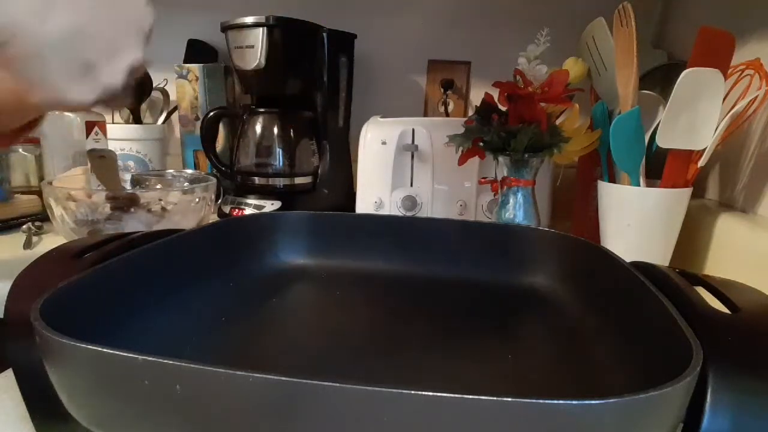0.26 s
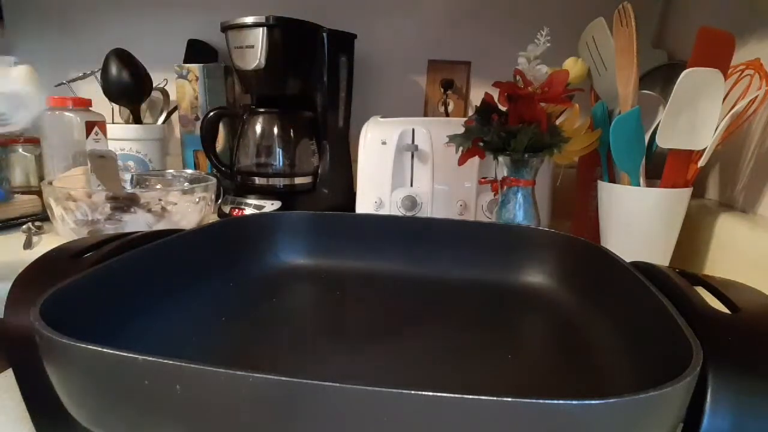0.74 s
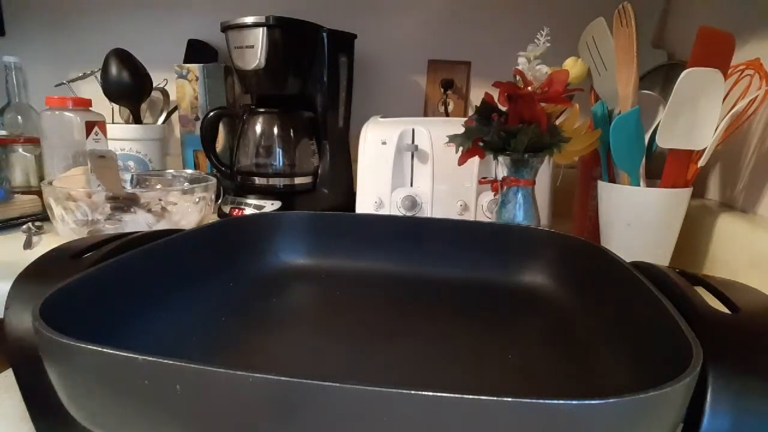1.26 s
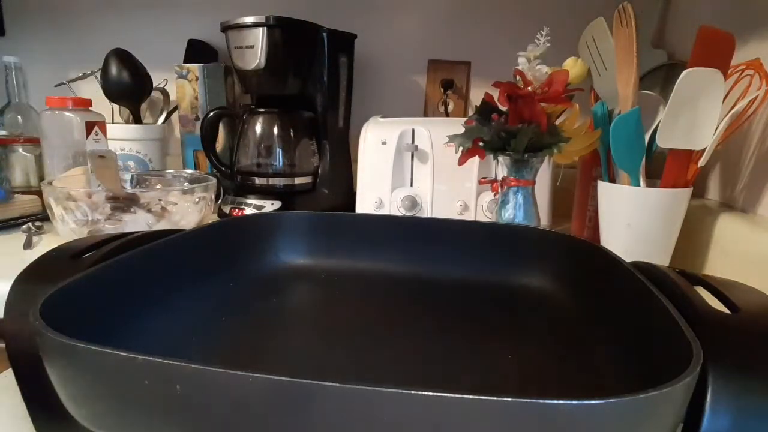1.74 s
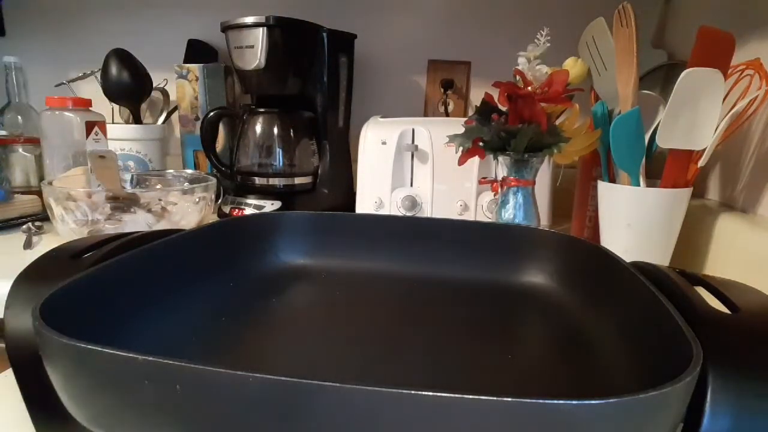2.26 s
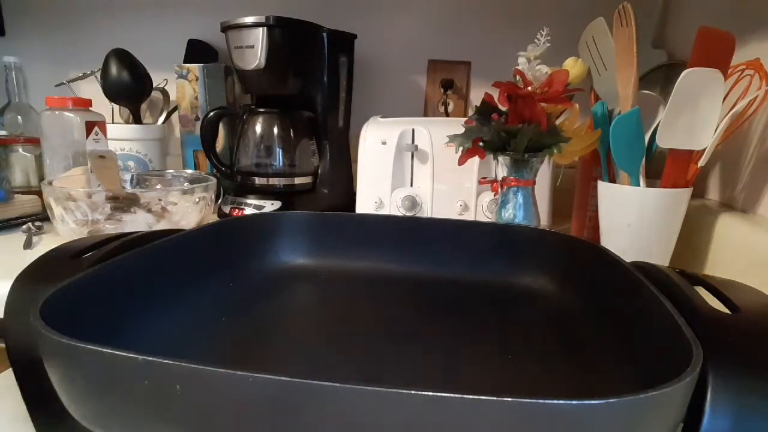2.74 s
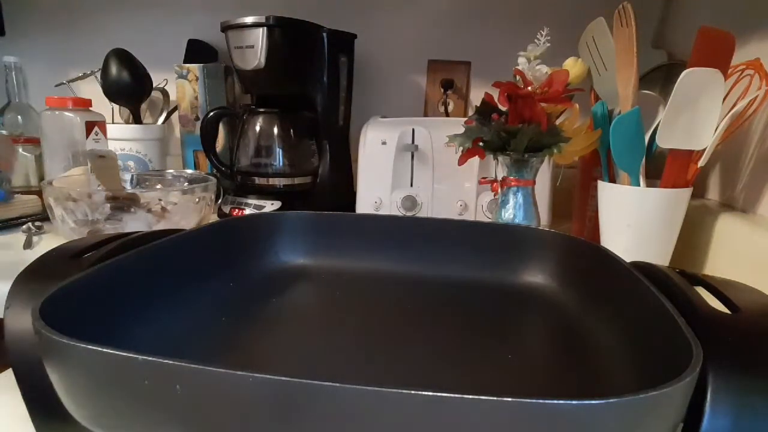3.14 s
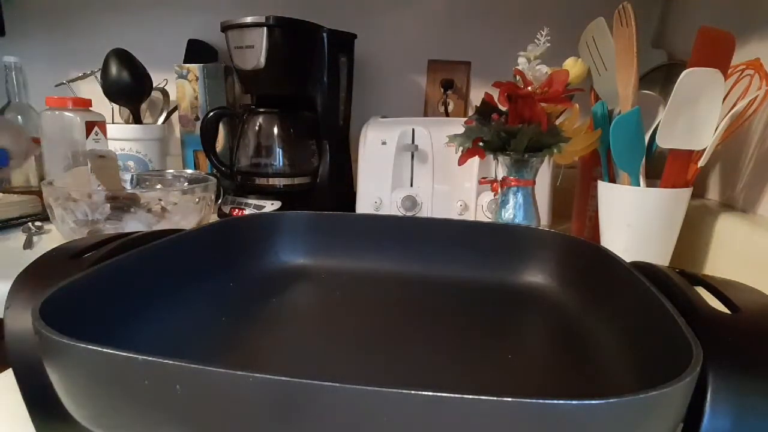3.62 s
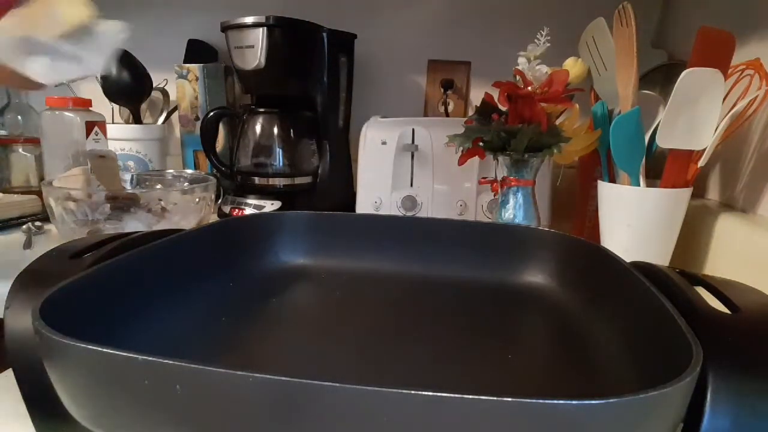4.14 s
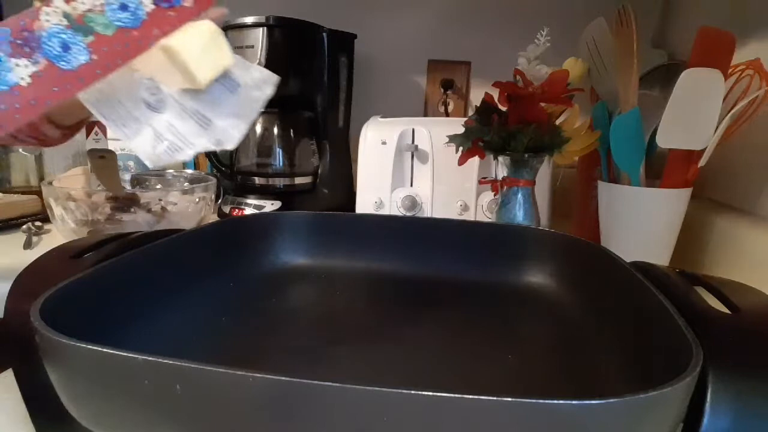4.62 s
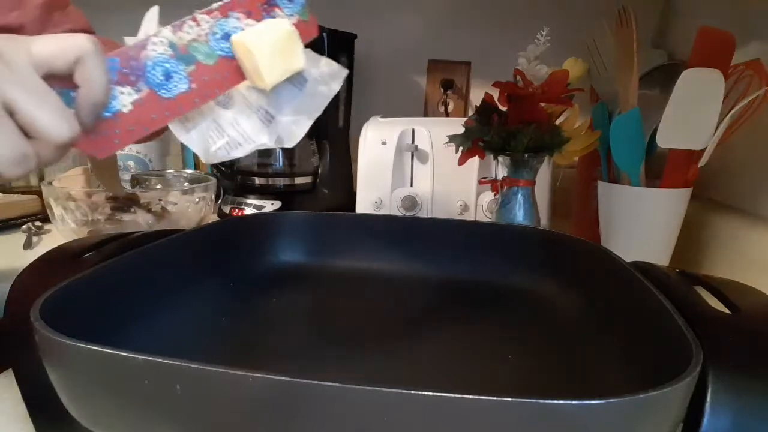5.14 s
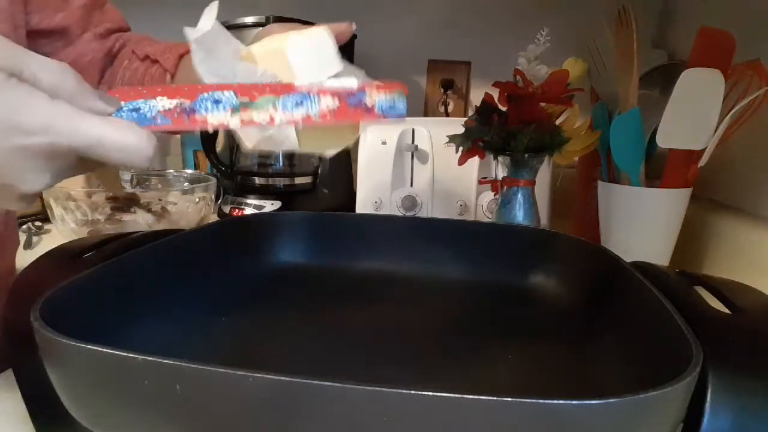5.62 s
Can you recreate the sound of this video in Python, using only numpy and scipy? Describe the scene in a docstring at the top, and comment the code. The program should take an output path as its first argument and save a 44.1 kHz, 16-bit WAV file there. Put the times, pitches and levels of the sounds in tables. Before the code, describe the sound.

Waxed butter paper crinkles and snaps in busy hands, a knife clacks once on a dish, then sparser crackles over faint room rumble.

```python
"""Waxed butter paper is unfolded and torn by hand: crease snaps, each a flurry of noise ticks ringing
a small panel and a hollow packet, over a rustle of countless random folds in half-octave bands.
A knife cuts through onto a dish, heard as a crack, rough decaying modes and a counter knock.
Feet shift on the floor as soft low thuds, above a steady household rumble and hiss.
A small hard kitchen adds a short diffuse tail; a camera with two spaced ports hears it all."""
import sys
import numpy as np
from scipy import signal
from scipy.io import wavfile
from scipy.ndimage import uniform_filter1d

SR = 44100
rng = np.random.default_rng(int(sys.argv[2]) if len(sys.argv) > 2 else 0)


def transcribe(u):
    """Save the signal u as a 16-bit wav file named by the first command-line argument.

    u: samples, shape (n,) or (channels, n), limited to [-1, 1]; the rate is SR.
    q: integer samples, one column per channel.
    """
    v = np.clip(np.atleast_2d(u).T, -1, 1)
    q = np.round(v * 32767).astype(np.int16)
    wavfile.write(sys.argv[1], SR, q)


N = 258867  # length in samples

# Spectrum of the waxed sheet. Each row: frequency in Hz, relative level in dB per Hz.
PAPER_SPECTRUM = [(180, -35), (300, -19.5), (352, -9.5), (818, -6.5), (2060, -1.5), (2540, -0.5),
                  (3120, -1), (6590, -5), (9510, -16.5), (11900, -31.5), (13500, -61.5)]
# How the hands move about. Each row: time in seconds, left minus right in dB,
# base level of the snaps' top treble in dB.
HAND_MOVES = [(0.3, 2.2, -37), (1.1, 0, -10), (1.8, -1.5, -31), (2.3, 0.8, -2.5), (3.0, -0.2, -16),
              (5.0, 2, -8), (5.6, 3.5, -12)]
HALF_OCTAVES_HZ = 280 * 2 ** np.arange(0, 5.7, .5)


def undb(db):
    """Decibels to amplitude."""
    return 10 ** (np.asarray(db) / 20)


def unit(x):
    """Scale to an RMS of 1."""
    return x / np.sqrt(np.mean(x ** 2))


def peak_one(x):
    """Scale to a peak of 1."""
    return x / abs(x).max()


def at_hz(table, hz):
    """Read a (Hz, value) table on a log-frequency axis."""
    table_hz, values = np.array(table).T
    return np.interp(np.log(hz), np.log(table_hz), values)


def band(x, hz, width):
    """Two-pole resonance, gain 1 at the centre."""
    return signal.lfilter(*signal.iirpeak(min(hz, .45 * SR), hz / width, fs=SR), x)


def band_twice(x, hz, width):
    """The same resonance twice over, for steeper skirts."""
    return band(band(x, hz, width), hz, width)


def coloured(x, table):
    """Sum of half-octave bands weighted by a spectrum."""
    return sum(undb(at_hz(table, hz)) * band_twice(x, hz, hz / 2) for hz in HALF_OCTAVES_HZ)


def walk(rate):
    """Random level that glides to a new value every 1 / rate seconds."""
    k = int(SR / rate)
    held = np.repeat(rng.standard_normal(N // k + 1), k)
    return 0.99 * uniform_filter1d(held, k)[:N]


def add(out, s, sound, pan_db):
    """Mix a sound in at time s; pan_db is left minus right."""
    i = int(s * SR)
    sides = undb(np.array([[pan_db], [-pan_db]]) / 2)
    out[:, i:i + sound.shape[-1]] += sides * sound[..., :N - i]


def burst(noise, rise_ms, t60):
    """Noise that swells exponentially and falls 60 dB in t60 seconds."""
    t = np.arange(noise.shape[-1]) / SR
    return noise * (1 - np.exp(-t * 1000 / rise_ms)) * 1000. ** (-t / t60)


def two_ways(a, c, apart):
    """One excitation as it reaches two ports: a shared part and a part of opposite sign."""
    return np.array([a + apart * c, a - apart * c])


def house():
    """Steady rumble and hiss; the bass is much alike at both ports, the treble unrelated."""
    # Each row: frequency in Hz, relative level in dB per Hz.
    house_spectrum = [(18, -44), (30, -11.5), (171, 7.5), (292, 1.5), (539, -2.5), (771, -14), (1890, -15),
                      (2560, -27.5), (7500, -24), (9200, -44), (11600, -45), (13500, -52)]
    level_db = -57.5  # RMS, before the 1.2 dB lift left and cut right
    out = 0
    for hz in 30 * 2 ** np.arange(0, 8.9, .5):
        mid, side = (band_twice(rng.standard_normal(N), hz, hz / 2) for _ in range(2))
        wide = np.clip(0.33 + hz / 2800.0, 0, 1)
        level = undb(at_hz(house_spectrum, hz) + 4.7 * walk(8.0))  # each band wavers on its own
        out = out + level * two_ways(mid, side, wide)
    return unit(out) * undb(level_db + np.array([[1.2], [-1.2]]))


def kitchen(x):
    """Diffuse echoes: noise dying away octave by octave, building up over the first milliseconds."""
    # Each row: frequency in Hz, time to fall 60 dB in seconds.
    decay_times = [(100, 0.55), (1000, 0.2), (4000, 0.34), (12000, 0.14)]
    room_db, build_s = -9, .012
    t, tail = np.arange(SR // 2) / SR, 0
    for hz in 90 * 2 ** np.arange(0, 8):
        mid, side = rng.standard_normal((2, len(t)))
        both = two_ways(mid, side, np.clip(hz / 630.0, 0, 1))  # the bass is narrower
        tail = tail + band(both, hz, 1.8 * hz) * 1000. ** (-t / at_hz(decay_times, hz))
    tail = tail * np.clip(t / build_s, 0, 1) ** 2
    tail = tail / np.linalg.norm(tail, axis=1, keepdims=True)
    # the right channel alone feeds both tails
    return undb(room_db) * signal.fftconvolve(x[1:], tail, axes=1)[:, :N]


def steps():
    """Soft pushes that ring a floorboard; the boards reach the two ports by different paths."""
    # Weight shifting on the floor. Each row: time in seconds (the swell starts 10 ms ahead),
    # peak level in dB, board pitch in Hz.
    footfalls = [(0.523, -45, 223), (1.418, -42.5, 178), (2.071, -51, 102), (3.218, -47.5, 107.7),
                 (3.26, -41.5, 110.8), (3.519, -33.5, 171), (3.558, -35, 139), (4.445, -38, 175.5),
                 (4.994, -38, 168.5)]
    out, noise = np.zeros((2, N)), rng.standard_normal((len(footfalls), 2, SR // 2))
    for (s, db, hz), (a, c) in zip(footfalls, noise):
        push = burst(two_ways(a, c, .36), rise_ms=22.0, t60=0.3)
        board = band(band(push, hz, 0.19 * hz), hz, 1.0 * hz)
        broad = band(band(push, 0.66 * hz, 6.2 * hz), 0.96 * hz, 2.2 * hz)
        add(out, s - .01, undb(db) * peak_one(board + 0.17 * broad), 1.5)
    return out


def cut():
    """The blade lands on the dish; dish and cutlery rattle, so each mode is a rough band, not a line."""
    # Modes of dish and cutlery. Each row: frequency in Hz, width in Hz before broadening,
    # relative level in dB.
    dish_modes = [(331, 60, -11), (1185, 84, -8.5), (1377, 25, -12.5), (1794, 18, -1.5), (1906, 21, -3),
                  (2230, 30, -5), (2290, 20, -3), (2390, 59, -8), (2910, 24, -5), (3030, 84, 1.5),
                  (3171, 15, -5.5), (3215, 42, -6.5), (3760, 26, -5), (3904, 76, 0), (4200, 35, -7.5),
                  (4753, 42, 0.5), (5400, 41, -7.5), (5630, 90, -7), (6130, 90, -6.5), (6760, 58, -7),
                  (7150, 200, -10), (7780, 150, -11.5), (8240, 220, -14.5), (10670, 520, -12),
                  (11000, 340, -17.5)]
    cut_s, cut_db, pan_db = 3.6328, -5, 2.2
    t60_s, t60_per_octave = 0.15, 0.93  # at 3 kHz; higher modes die sooner
    out, ring, settle = np.zeros((2, N)), 0, 8192  # samples for the filters to settle
    rattle = rng.standard_normal((len(dish_modes), 2, SR // 2 + settle))
    for (hz, width, db), noise in zip(dish_modes, rattle):
        mode = band(band(noise, hz, 1.9 * width), hz, 3 * width)[:, settle:]
        mode = burst(mode, 3.9, t60_s * t60_per_octave ** np.log2(hz / 3000))
        ring = ring + undb(db) * unit(mode)
    chatter = undb(4.0 * walk(120)[:SR // 2])  # the blade chatters on the glaze
    add(out, cut_s, undb(cut_db - 30.0) * ring * chatter, pan_db)

    crack = coloured(burst(rng.standard_normal((2, 8192)), 0.56, 0.044), PAPER_SPECTRUM)
    add(out, cut_s, undb(cut_db - 2.0) * peak_one(crack), pan_db)

    # the counter under the dish
    knock = burst(rng.standard_normal(8192), 1.0, 0.1)
    counter = band(knock, 865, 390)
    counter = counter + undb(-1.5) * band(band(knock, 270, 80), 255, 150)
    counter = counter + undb(-8.5) * band(band(knock, 55, 50), 55, 80)
    add(out, cut_s, undb(cut_db - 8.5) * peak_one(counter), pan_db)
    return out


def handling():
    """Bouts swell, hold and die away; overlapping bouts add up, their tilts averaged by strength."""
    # Bouts of handling the paper. Each row: start in seconds, hold in seconds, rustle level in dB,
    # treble tilt in dB per octave.
    bouts = [(-0.04, 0.013, -32.5, 0.5), (0.1, 0.12, -39, -2), (0.417, 0.15, -38, 1),
             (0.756, 0.05, -47, 1.5), (0.86, 0.072, -34, 0), (1.055, 0.1, -29, 1.5), (1.307, 0.29, -47, 1),
             (1.57, 0.21, -49, 0.5), (1.804, 0.17, -42, 1), (2.144, 0.012, -47.5, -5),
             (2.22, 0.043, -39.5, 1), (2.38, 0.046, -43, -2.5), (2.639, 0.044, -50, 4.5),
             (2.752, 0.052, -47, -3), (2.866, 0.069, -45, -5), (3.135, 0.05, -52, 3.4),
             (3.487, 0.044, -46.5, -4.5), (3.965, 0.17, -64.5, 4), (4.447, 0.034, -61, -3),
             (4.684, 0.06, -57.5, 1.5), (4.878, 0.09, -51.5, -3.5), (5.371, 0.094, -51, -7.5),
             (5.546, 0.032, -41.5, -3.5), (5.773, 0.092, -59.5, -3)]
    attack_s, fall_db_s = 0.036, 165
    start, hold, db, tilt = np.array(bouts).T[..., None]
    grid_s = np.arange(0, N, 44) / SR  # about one point per millisecond
    t = grid_s - start
    fallen_db = fall_db_s * np.maximum(t - attack_s - hold, 0)
    gain = np.clip(t / attack_s, 0, 1) ** 2 * undb(db - fallen_db)
    total = gain.sum(axis=0) + 1e-9
    mean_tilt = (gain * tilt).sum(axis=0) / total
    return (np.interp(np.arange(N) / SR, grid_s, curve) for curve in (total, mean_tilt))


def folds(hz):
    """Sparse folds that only panels of one size answer; each dies away over some ten cycles."""
    sizes = undb(4.5 * np.minimum(rng.exponential(size=N), 3))
    hits = min(hz / 1500, 1) * sizes * (rng.random(N) < 60 / SR)  # about 60 a second
    return signal.lfilter([1], [1, -np.exp(-hz / SR / 9.9)], hits)


def rustle():
    """Countless small folds: ticks of very unequal size, partly common to all bands, in uneven flurries."""
    gain, tilt = handling()
    sizes = undb(3.1 * np.minimum(rng.exponential(size=N), 5))
    common = sizes * (rng.random(N) < .01)
    common = signal.lfilter([1], [1, -.97], common)  # each fold lasts about a millisecond
    flurry_db, out = 3.5 * walk(60), 0
    for hz in HALF_OCTAVES_HZ:
        a, c = rng.standard_normal((2, N))
        strength = 0.73 + 0.51 * common + 1.4 * folds(hz)
        flutter = undb(-6.5 + flurry_db + 3.0 * walk(55))  # shared flurry plus the band's own
        ticks = two_ways(a, c, 0.91) * strength * flutter
        colour = undb(at_hz(PAPER_SPECTRUM, hz) + tilt * np.log2(hz / 3000))
        out = out + colour * band_twice(ticks, hz, hz / 2)
    hand_s, hand_pan_db, _ = np.transpose(HAND_MOVES)
    pan_db = np.interp(np.arange(N) / SR, hand_s, hand_pan_db)
    return out * gain * undb(np.array([pan_db, -pan_db]) / 2)


def snaps():
    """A crease buckles in a flurry of ticks; they ring a small panel of paper and thump the packet."""
    # Each row: start in seconds, peak of the sheet sound in dB, panel pitch in Hz,
    # hollow knock in dB relative to that peak, nominal fall in ms.
    creases = [(0.0282, -22.5, 2900, -39, 5), (0.1126, -23, 2090, -25, 6), (0.134, -25, 2960, -33, 22),
               (0.177, -23.5, 2300, -24, 9), (0.1938, -23, 3370, -24, 10.4), (0.2372, -16.5, 3580, -18, 8),
               (0.25, -18, 3800, -17.5, 9), (0.2786, -19, 4970, -15, 8), (0.452, -11.5, 3540, -35, 7.4),
               (0.525, -15.5, 3520, -21, 19), (0.775, -30.5, 5060, -18, 2.8), (0.8802, -27, 3820, -20, 21),
               (0.9232, -17, 1750, -11.5, 6.1), (0.938, -12.5, 3500, -38, 6.1),
               (1.021, -11.5, 3240, -10, 10.7), (1.063, -6, 3440, -18.5, 2.1),
               (1.15, -15.5, 3860, -7.5, 15.4), (1.1956, -23.5, 3960, -7.5, 15),
               (1.225, -20.5, 3660, -26, 5.1), (1.249, -16, 3700, -13, 4.6), (1.2578, -39, 2000, -4, 1.6),
               (1.303, -22, 4200, -23, 4.5), (1.5238, -31, 2620, -23, 24), (1.6855, -31.5, 6800, -34, 1.8),
               (1.714, -25, 2040, -29, 4.7), (1.725, -21, 2120, -33, 3.6), (1.811, -16, 1960, -27, 11),
               (1.8156, -6.5, 2750, -18.5, 6.6), (1.827, -18.5, 2100, -24, 14),
               (1.8928, -18, 2010, -23, 1.9), (1.9005, -14.5, 2070, -53, 28),
               (1.9202, -7.5, 4070, -29.5, 2.7), (1.925, -9, 2300, -10, 4), (2.022, -23, 2380, -19, 2.7),
               (2.126, -35, 4330, -30, 5.6), (2.167, -32, 4850, -37, 2), (2.175, -36, 1920, -6, 11.4),
               (2.2244, -21, 1900, -19.5, 4), (2.294, -22, 4800, -22, 2), (2.307, -25, 2060, -16, 6),
               (2.328, -6.5, 4780, -31.5, 1.5), (2.796, -38, 1710, 2.5, 8.7),
               (2.891, -24.5, 1960, -15, 6.8), (2.896, -16.5, 3240, -25, 7.1), (2.903, -20.5, 3650, -19, 6),
               (2.9529, -17.5, 4860, -47, 5), (2.979, -29.5, 4140, -30, 32), (3.0988, -27, 3640, -29, 25),
               (3.9735, -36, 2020, -12.5, 19), (4.322, -48, 4400, -25, 29), (4.4231, -37.5, 1790, -4, 13.8),
               (4.939, -31.5, 4220, -18, 25.4), (4.96, -29.5, 3320, -36, 27),
               (4.987, -29.5, 2000, -21, 3.4), (5.0149, -17, 3840, -40, 4.1), (5.1739, -28.5, 2850, -23, 3),
               (5.19, -13, 2900, -29, 8.8), (5.2731, -32.5, 1560, 6.5, 1.49), (5.453, -33, 1980, -14, 8),
               (5.4875, -7, 3940, -14, 1.07), (5.497, -36, 5800, -24, 4.4), (5.534, -22, 2060, -10, 12.6),
               (5.603, -17.5, 2060, -28, 3), (5.6084, -15.5, 2960, -26, 5), (5.6269, -22, 3000, -13, 4),
               (5.645, -16, 3980, -15.5, 4.8), (5.657, -27, 3040, 0, 3.2)]
    # The hollow knock as the packet changes shape in the hands. Each row: time in seconds, pitch in Hz.
    packet_pitch = [(0.2, 602), (0.93, 542), (1.03, 373), (1.15, 349), (1.5, 358), (1.82, 460), (3.1, 425),
                    (5.2, 414), (5.3, 667), (5.5, 705), (5.63, 324)]
    glint_hz, glint_width_hz, loud_snap_db = 11800, 6800, -15
    hand_s, hand_pan_db, hand_top_db = np.transpose(HAND_MOVES)
    out, noise = np.zeros((2, N)), rng.standard_normal((len(creases), 3, 4096))
    random_places = rng.random((len(creases), 5))
    t = np.arange(4096) * 1000 / SR  # ms
    for (s, db, hz, knock_db, fall_ms), (a, b, c), places in zip(creases, noise, random_places):
        rise_ms = 2.019 + 0.1164 * fall_ms  # a longer flurry also starts more slowly
        knock_hz = np.interp(s, *np.transpose(packet_pitch))
        pan_db = np.interp(s, hand_s, hand_pan_db)
        top_db = np.interp(s, hand_s, hand_top_db)

        # uneven ticks around the main crack
        fall = np.exp(-(abs(t - rise_ms) / (1.185 * fall_ms)) ** 1.4)
        shape = np.where(t < rise_ms, (t / rise_ms) ** 2, fall)
        crack = 1.2 * np.exp(-(4 * (t - rise_ms)) ** 2)
        flurry = shape * undb(25 * uniform_filter1d(b, size=40)) + crack
        ticks = flurry * two_ways(a, c, 0.84)  # the sheet radiates unevenly towards the two ports

        panel = band(band(ticks, hz, .2 * hz), hz, hz)
        sheet = unit(coloured(ticks, PAPER_SPECTRUM)) + 1.6 * unit(panel)
        # a few narrow resonances at random pitches colour each snap
        pitches = 1700 * 4.5 ** places
        resonances = sum(band(band(ticks, f, .06 * f), f, f) * 3000 / f for f in pitches)
        sheet = sheet + 1.3 * unit(resonances)
        # quick, hard snaps are brighter
        glint_db = top_db - 1.6 * np.log2(fall_ms) + .25 * (db - loud_snap_db)
        sheet = sheet + undb(glint_db) * unit(band_twice(ticks, glint_hz, glint_width_hz))

        knock = band(ticks[0], knock_hz, 0.095 * knock_hz) + 0.26 * ticks[0]
        knock = band(knock, knock_hz, 3.7 * knock_hz)
        knock = band(knock, 1.7 * knock_hz, 1.86 * knock_hz)  # a small packet gives no deep bass
        add(out, s, undb(db) * (peak_one(sheet) + undb(knock_db) * peak_one(knock)), pan_db)
    return out


def scene():
    """Paper and knife, direct and through the kitchen, over the floor and the household."""
    hands = snaps() + rustle() + cut()
    port_lag_ms = .41
    lag = int(round(port_lag_ms * SR / 1000))
    left = np.r_[np.zeros(lag), hands[0, :N - lag]]  # the left port hears it later
    direct = np.array([left, hands[1]])
    return direct + kitchen(hands) + steps() + house()


def record(dry):
    """The camera's case colours the sound; the loudest peaks are rounded and the top is cut."""
    # Resonance and hollow of the case. Each row: centre in Hz, width in Hz,
    # share added to the sound (negative for the hollow).
    case_modes = [(2006, 240, 0.13), (2550, 360, -0.19)]
    top_hz = 13600
    heard = dry + sum(share * band(dry, hz, width) for hz, width, share in case_modes)
    rounded = 1.3 * np.tanh(heard / 1.3)
    return signal.sosfilt(signal.ellip(8, .2, 70, top_hz, fs=SR, output="sos"), rounded)


dry = scene()
out = record(dry)
transcribe(out)
```